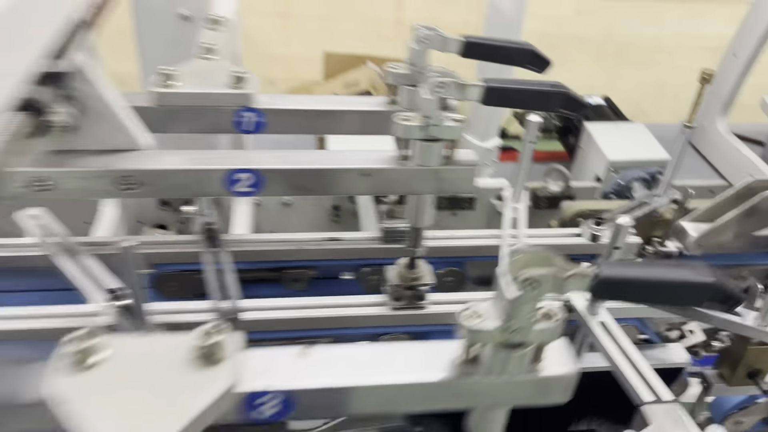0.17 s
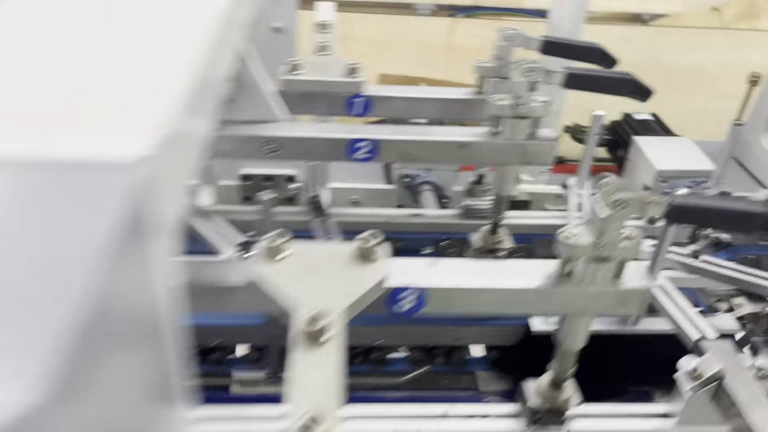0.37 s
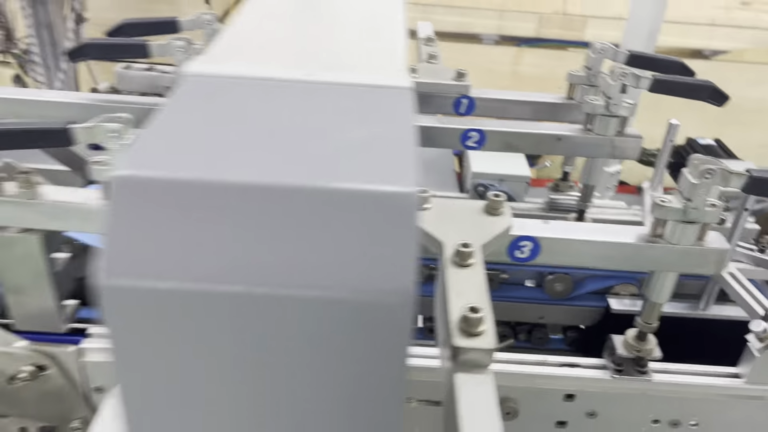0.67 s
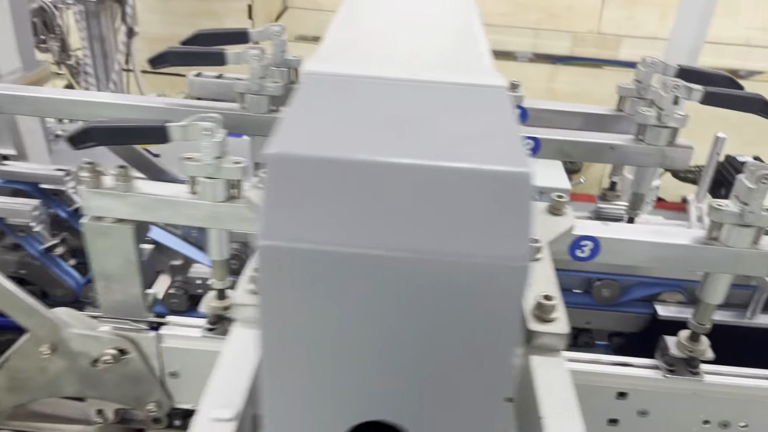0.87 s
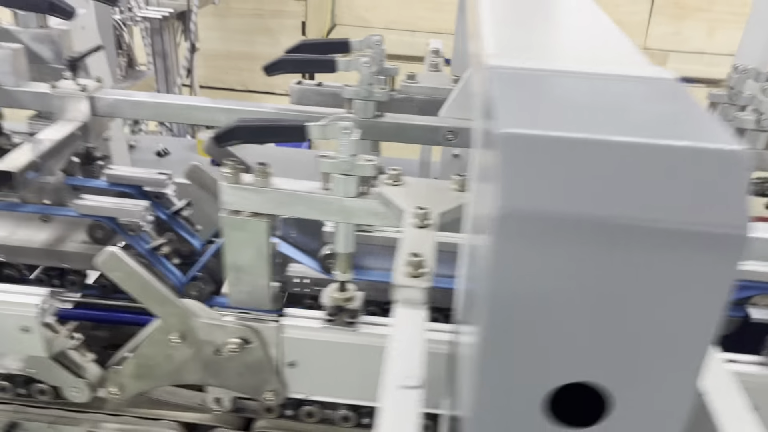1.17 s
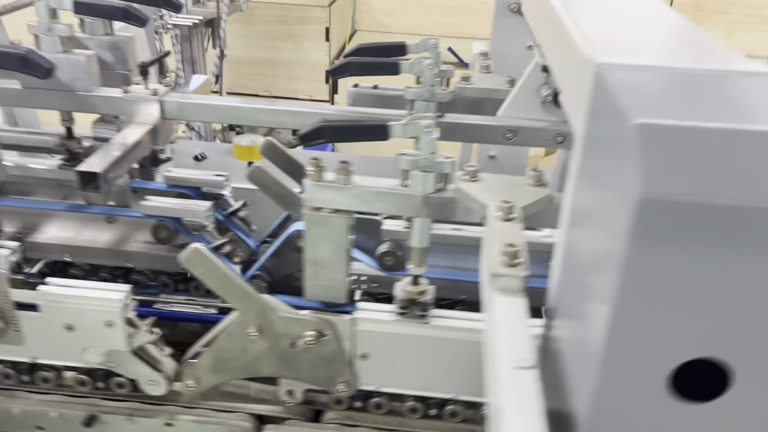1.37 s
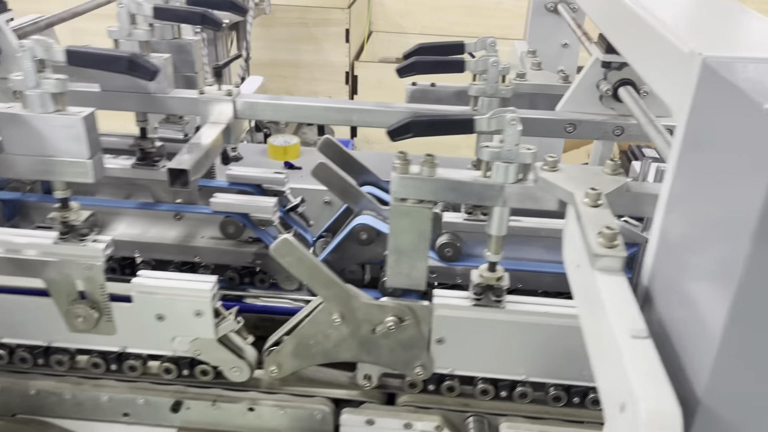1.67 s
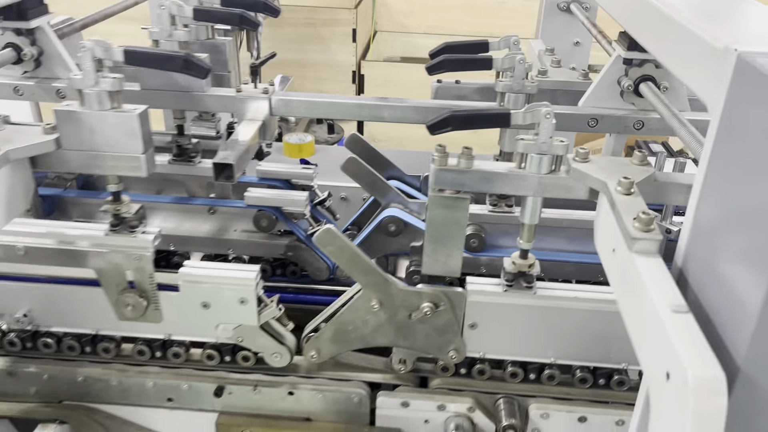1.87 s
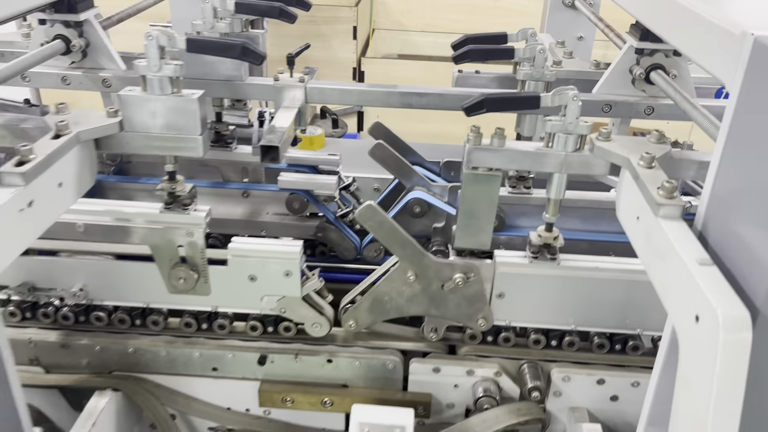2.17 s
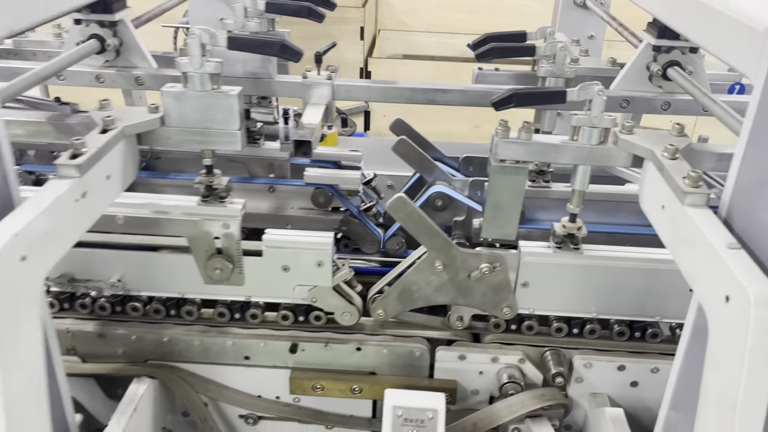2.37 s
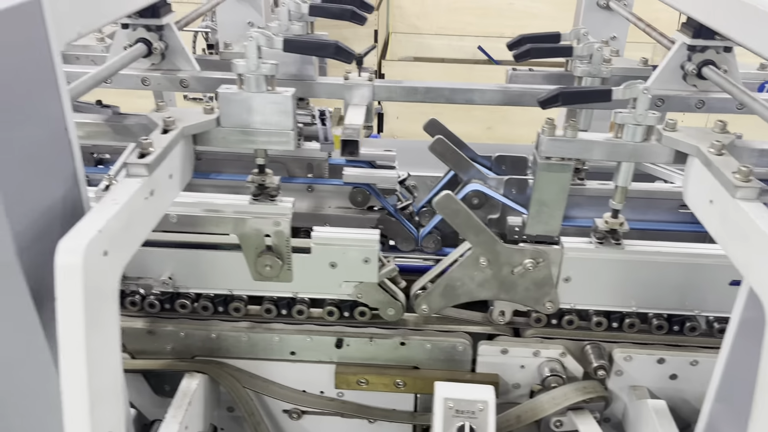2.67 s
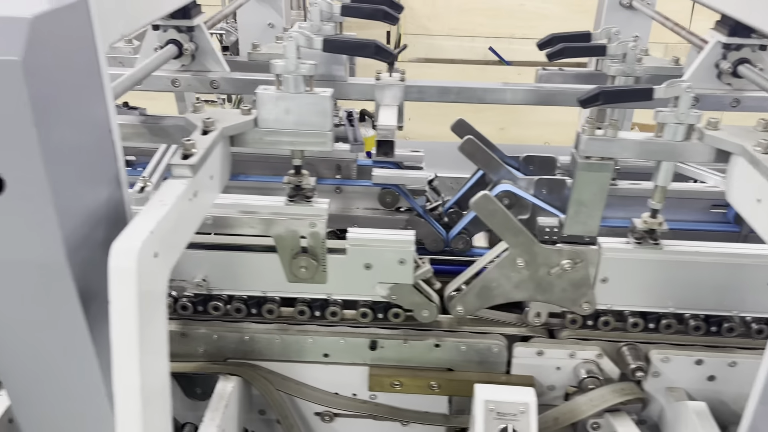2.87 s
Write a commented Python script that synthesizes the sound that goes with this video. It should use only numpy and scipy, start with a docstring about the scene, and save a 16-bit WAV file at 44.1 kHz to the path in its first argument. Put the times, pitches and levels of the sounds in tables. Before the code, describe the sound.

A folder gluer runs steadily in a workshop, about three blanks a second: each brings a rub, four rapid slaps, a metallic guide knock and a hollow boom, over rumble and chain rattle, heard close in stereo.

```python
"""In a workshop a folder gluer runs, passing about three cardboard blanks a second.
Each blank rubs along the belts, knocks the guides into a drone of beating sines, slaps through four
folding steps (noise bursts and ringing metal modes) and ends in a hollow, sagging boom.
Coloured noise makes the drive's rumble and the chain and roller rattle, sines its hum and thin motor whine.
The microphone drifts away from the slaps: their snap fades while their flutter grows."""
import sys
import numpy as np
from scipy import signal
from scipy.fft import rfft, irfft
from scipy.io import wavfile

SR = 44100
rng = np.random.default_rng(int(sys.argv[2]) if len(sys.argv) > 2 else 0)


def materialize(psi):
    """Save the field psi as 16-bit PCM at rate SR to the path in sys.argv[1].

    A 1-D psi becomes a single channel; in a 2-D psi each row is a channel.
    """
    bounded = np.clip(np.atleast_2d(psi).T, -1, 1)
    quanta = np.round(bounded * 32767).astype(np.int16)
    wavfile.write(sys.argv[1], SR, quanta)


N = 132741
T, HZ = np.arange(N) / SR, np.fft.rfftfreq(N, 1 / SR)

# Blanks passing through: start_s, slap_1_db, slap_2_db, slap_3_db, slap_4_db, rub_db, drone_db,
# guide_knock_db, boom_db
BLANKS = [(0.001, -21, -19, -16, -22.5, -28.5, -27.5, -21, -26.5),
          (0.342, -22, -18, -17, -25.5, -29.5, -26, -20, -25.5),
          (0.683, -28, -22, -19.5, -22.5, -32.5, -31.5, -24, -26.5),
          (1.024, -24.5, -22.5, -19, -23.5, -34.5, -33.5, -28, -25.5),
          (1.367, -25, -23.5, -21, -24.5, -34.5, -30.5, -21, -24.5),
          (1.708, -26.5, -26.5, -23, -27, -33.5, -29, -28, -27.5),
          (2.049, -25, -27, -23.5, -28.5, -32.5, -24.5, -16.5, -36),
          (2.392, -27.5, -26.5, -27, -30, -33, -26.5, -19.5, -38),
          (2.732, -28, -27, -32, -29.5, -32.5, -26.5, -19, -27.5)]
# Ringing modes of the guides: pitch_hz, level_db, pitch_waver_hz (for the drone)
GUIDES = [(354, -7, 4.7), (380, -12.5, 4.77), (394.3, -10.5, 4.1), (408.4, -3, 2.33), (439.5, -14, 6.1)]


def amp(db):
    """Decibels to gain."""
    return 10 ** (np.asarray(db) / 20)


def unit(x):
    """Scales to rms 1."""
    return x / np.sqrt(np.mean(abs(x) ** 2) + 1e-20)


def read(points):
    """Reads a spectrum table onto the frequency grid, straight lines over log frequency."""
    hz, value = np.transpose(points)
    return np.interp(np.log(HZ + 1), np.log(hz), value)


def colour(x, gain):
    """Filters by a gain curve scaled to mean power 1, so white noise keeps its level."""
    return irfft(rfft(x) * unit(gain), N)


def noise():
    """Two unrelated white noises."""
    return rng.standard_normal((2, N))


def waver(hz):
    """Slow chance movement of rms 1, up to about the given rate."""
    return unit(colour(rng.standard_normal(N), np.exp(-(HZ / hz) ** 2)))


def swell(start, delay, attack, hold, decay):
    """Envelope with straight attack, hold and exponential release, all in seconds."""
    t = T - start - delay
    return np.clip(t / attack, 0, 1) * np.exp(-np.maximum(t - attack - hold, 0) / decay)


def card_ring():
    """Broad resonances of the card, as a gain curve."""
    # Resonances: pitch_hz, width_hz, boost_db
    card = [(910, 130, 3), (1210, 100, 3), (1360, 110, 1.5), (1970, 870, 1), (2520, 450, 3.5),
            (3130, 290, 1)]
    boost_db = sum(db / (1 + (2 * (HZ - hz) / width) ** 2) for hz, width, db in card)
    return amp(boost_db)


def drive():
    """Frame rumble and belt wash are shaped noise; drive hum and motor tones are wavering sines."""
    # Frame rumble spectrum: frequency_hz, relative_level_db
    rumble_spectrum = [(30, -50), (55, -4), (72, -2.5), (84, -1.5), (100, 1), (120, -4), (155, -3),
                       (200, -4.5), (300, -10.5), (450, -28), (900, -36)]
    # Deep rumble spectrum: frequency_hz, relative_level_db
    deep_spectrum = [(15, -60), (30, -40), (38, -1.5), (48, 0.5), (58, 2), (70, -4), (100, -37), (200, -63)]
    # Belt wash spectrum: frequency_hz, relative_level_db
    wash_spectrum = [(100, -6), (250, -1.5), (450, 0.5), (600, -6), (750, -10.5), (1100, -9.5),
                     (1600, -13.5), (2600, -17.5), (3700, -19.5), (5000, -19.5), (7000, -26.5),
                     (9500, -24.5), (12000, -25.5), (14000, -32), (16000, -61)]
    # Moving levels of deep rumble and hum: time_s, deep_db, hum_db
    low_levels = [(0, -48, -31), (.12, -31, -31), (.45, -33, -41), (.59, -39, -50), (.72, -32.5, -32),
                  (1.1, -31.5, -38), (1.38, -40, -28.5), (1.68, -29, -35.5), (2, -39, -37),
                  (2.18, -31.5, -33.5), (2.33, -24, -27), (2.5, -26.5, -36), (2.62, -35, -43),
                  (2.8, -24.5, -37), (3, -42, -26)]
    # Steady drive tones: pitch_hz, level_db, level_waver_share, pitch_waver_hz
    tones = [(411.7, -43.5, 0.19, 2.03), (1168, -61, 0.61, 3.46), (10600, -57, .5, 14)]
    rumble_db, wash_db, wash_waver_db = -28.5, -29.5, 0.5
    hum_hz, hum_waver_hz = 80.66, 2.57

    times, deep_db, hum_db = np.transpose(low_levels)
    out = colour(noise(), amp(read(rumble_spectrum))) * amp(rumble_db)
    out += colour(noise(), amp(read(deep_spectrum))) * amp(np.interp(T, times, deep_db))
    out += colour(noise(), amp(read(wash_spectrum))) * amp(wash_db + wash_waver_db * waver(hz=40))
    hum_turns = np.cumsum(hum_hz + hum_waver_hz * waver(hz=13.0)) / SR
    out[0] += unit(np.sin(2 * np.pi * hum_turns)) * amp(np.interp(T, times, hum_db))
    for hz, db, share, waver_hz in tones:
        turns = np.cumsum(hz + waver_hz * waver(hz=13.3)) / SR
        out[0] += amp(db) * unit(np.sin(2 * np.pi * turns) * (1 + share * waver(hz=22)))
    return out


def whine():
    """The motor's thin whine: one high sine that wavers in pitch and flickers in level."""
    # Level of the whine: time_s, level_db
    whine_levels = [(0, -44), (.6, -48.5), (1.3, -52), (1.75, -46.5), (1.95, -45.5), (2.15, -51),
                    (2.4, -48), (3, -47)]
    pitch_hz, pitch_waver_hz, flicker_share = 10668, 5.83, 0.49

    turns = np.cumsum(pitch_hz + pitch_waver_hz * waver(hz=25)) / SR
    tone = np.sin(2 * np.pi * turns)
    level = amp(np.interp(T, *np.transpose(whine_levels)))
    flickering = unit(tone * (1 + flicker_share * waver(hz=45)))
    return np.array([level * flickering, np.zeros(N)])


def rattle():
    """Chain links and rollers tick at random: short decaying noise grains of uneven size."""
    # Rattle spectrum: frequency_hz, relative_level_db
    rattle_spectrum = [(300, -20), (900, 11), (1600, -10), (2800, 3.5), (5000, -6.5), (8000, 0),
                       (12000, -3), (15500, -21)]
    level_db, ticks_per_s, spread_db, decay_s = -43.5, 350, 4, 0.0013

    strikes = rng.random(N) < ticks_per_s / SR
    size = amp(spread_db * np.minimum(rng.exponential(1, N), 3.5)) * strikes
    # Overlapping grains add in power
    power = signal.lfilter([1], [1, -np.exp(-1 / (decay_s * SR))], size ** 2)
    grains = noise() * np.sqrt(power)
    return amp(level_db) * unit(colour(grains, amp(read(rattle_spectrum))))


def drone():
    """The guides sing in a cluster of beating low modes while a blank drags over them."""
    roughness = 0.26  # share of level waver
    level = sum(amp(db) * swell(start, delay=-0.091, attack=0.07, hold=0.12, decay=0.055)
                for start, *_, db, _, _ in BLANKS)
    ring = np.zeros((2, N))
    for row in ring:
        for hz, db, waver_hz in GUIDES:
            turns = np.cumsum(hz + waver_hz * waver(hz=19.9)) / SR + rng.random()
            row += amp(db) * unit(np.sin(2 * np.pi * turns) * (1 + roughness * waver(hz=40.4)))
    return ring * level


def rub():
    """Each blank scrapes unevenly between belts and rails: rough noise through the card's resonances."""
    # Rub spectrum: frequency_hz, relative_level_db
    rub_spectrum = [(200, -41), (550, 9.5), (900, 1.5), (1400, 4), (2000, -4), (3100, 1), (5000, -3),
                    (8000, -7), (12000, -13.5), (15500, -11)]
    level = sum(amp(db) * swell(start, delay=-0.062, attack=0.15, hold=0.045, decay=0.046)
                for start, *_, db, _, _, _ in BLANKS)
    unevenness = amp(2.0 * waver(hz=160))
    return colour(noise() * level * unevenness, amp(read(rub_spectrum)) * card_ring())


def knocks():
    """Each blank bumps the guides: their low modes start together, then beat as they die."""
    delay_s, attack_s, detune_hz = 0.00498, 0.01007, 3.25
    out = np.zeros((2, N))
    for start, *_, db, _ in BLANKS:
        t = T - start - delay_s - attack_s  # the modes line up at the end of the attack
        ring = np.zeros(N)
        for hz, mode_db, _ in GUIDES:
            detuned_hz = hz + detune_hz * rng.standard_normal()
            ring += amp(mode_db) * np.cos(2 * np.pi * detuned_hz * t)
        out[0] += amp(db) * swell(start, delay_s, attack_s, hold=0.014, decay=0.062) * ring
    return out


def slaps():
    """Flaps snap against the folders, rebound and flutter as noise; the metal rings in decaying sines."""
    # Contact and rebounds, one list per folding step: delay_s after the blank's start, relative_level_db
    folds = [
        [(-.021, 4), (-.018, 1.5), (-.015, -2)],
        [(.021, 3.5), (.0235, -0.5), (.027, -3)],
        [(.064, 1.5), (.0695, 1.5), (.073, -1.5), (.085, -3.5)],
        [(.109, 1.5), (.112, -2), (.119, -2)],
    ]
    # Noise of each folding step: snap_db, snap_decay_s, flutter_db, flutter_decay_s
    fold_tone = [(2, 0.002, -10.5, 0.014), (1.5, 0.0013, -13, .0034), (0.5, 0.00083, -9, 0.0052),
                 (4.5, 0.0014, -5.5, 0.017)]
    # Modes of the metal folder, one list per folding step: pitch_hz, relative_level_db, t60_s
    folder_modes = [
        [(1034, -12, .05), (2600, -16, 0.056), (4190, -10, 0.022), (4750, -26, 0.022)],
        [(2370, -7.5, 0.023), (2630, -13, 0.033), (2900, -8, 0.036), (4980, -14, 0.053), (5440, -12.5, 0.056),
         (5730, -14, 0.018)],
        [(1716, -12.5, 0.034), (1930, -10, 0.019), (2255, -12.5, 0.023), (2470, -15, .02), (3140, -13, 0.02),
         (4440, -9, 0.021), (7190, -9.5, .025)],
        [(1080, -8.5, 0.1), (1760, -19, 0.061), (2410, -22, .06), (3220, -18, .06), (12200, -13, .06)],
    ]
    # Colour of snap and flutter, one list per folding step: frequency_hz, relative_level_db
    fold_colours = [
        [(150, 12.5), (500, 4), (1000, 5.5), (1400, 2), (2600, 0), (3700, -1.5), (4600, 2), (6300, -4),
         (9000, 0), (12500, -9), (15500, -20)],
        [(150, 14), (500, -1), (1000, -8), (1900, -13), (2600, -1), (3700, -3), (5600, 5), (6600, -3),
         (9000, -5), (12500, -8), (15500, -19)],
        [(150, 0.5), (500, -6), (1300, -9.5), (2100, 7.5), (3100, 4.5), (3800, -6), (5000, -0.5), (6300, -1.5),
         (9000, 3), (12500, 1), (15500, -5)],
        [(150, 12.5), (600, -6), (1100, 6), (1700, -1), (2100, -4), (3300, 2.5), (4200, -2.5), (6300, -4),
         (9000, 1.5), (12500, -4.5), (15500, -9)],
    ]
    snap_fade_db_per_s, flutter_rise_db_per_s, ring_fade_db_per_s = 4, 1.7, 0.4
    ring_rise_s, ring_detune_share, ring_scatter_db = 0.0016, 0.012, 2

    out, t = np.zeros((2, N)), T[:SR // 8]
    for k, contacts in enumerate(folds):
        snap_db, snap_s, flutter_db, flutter_s = fold_tone[k]
        hz, mode_db, t60 = np.transpose(folder_modes[k])[:, :, None]
        blows = np.zeros(N)  # power of each contact
        for start, *levels in BLANKS:
            for delay, contact_db in contacts:
                at = int((start + delay) * SR)
                detune, scatter, *phases = rng.uniform(-1.11, 1, (4, len(hz), 1))
                if not 0 <= at < N:
                    continue
                blow_db = levels[k] + contact_db
                blows[at] += amp(blow_db) ** 2
                ring_db = blow_db + mode_db + ring_scatter_db * scatter - ring_fade_db_per_s * start
                ring_level = amp(ring_db - 60 * t / t60) * np.minimum(t / ring_rise_s, 1)
                ring_hz = hz * (1 + ring_detune_share * detune)
                ring = ring_level * np.sin(2 * np.pi * ring_hz * t + np.pi * np.array(phases))
                out[:, at:at + len(t)] += ring.sum(1)[:, :N - at]
        snap_blows = blows * amp(snap_db - snap_fade_db_per_s * T) ** 2
        flutter_blows = blows * amp(flutter_db + flutter_rise_db_per_s * T) ** 2
        power = signal.oaconvolve(snap_blows, np.exp(-2 * T / snap_s))
        power += signal.oaconvolve(flutter_blows, np.exp(-2 * T / flutter_s))
        burst = noise() * np.sqrt(abs(power))[:N]
        out += colour(burst, amp(read(fold_colours[k])) * card_ring())
    return out


def clacks():
    """Now and then a stiff flap lands hard: a noise burst around a knock pitch of its own."""
    # Hard landings: start_s, level_db, decay_s, knock_pitch_hz
    landings = [(0.0704, -12, 0.0024, 2240), (0.1194, -24.5, 0.0092, 1380), (0.752, -30, .004, 2300),
                (.806, -29, .009, 1230), (1.0882, -25, 0.0018, 2500), (1.093, -24.5, 0.0035, 2520),
                (2.5017, -29.5, 0.014, 2770)]
    width_octaves = 0.68
    out = np.zeros((2, N))
    for start, db, decay, hz in landings:
        body = np.exp(-(np.log2((HZ + 1) / hz) / width_octaves) ** 2 / 2)
        burst = noise() * amp(db) * swell(start, delay=0, attack=0.00042, hold=0, decay=decay)
        out += colour(burst, body * card_ring())
    return out


def ticks():
    """Card edges catch the rails with a thin, bright tick of very short noise."""
    # Ticks: start_s, level_db
    catches = [(.086, -22), (.767, -22), (1.736, -31), (1.789, -26), (1.8192, -20), (2.077, -28),
               (2.473, -20), (2.811, -25.5)]
    # Tick spectrum: frequency_hz, relative_level_db
    tick_spectrum = [(1000, -35), (4000, -19), (7000, -3), (10500, 13), (13000, 3), (15500, -8)]
    level = sum(amp(db) * swell(start, delay=0, attack=0.0003, hold=0, decay=0.0016)
                for start, db in catches)
    return colour(noise() * level, amp(read(tick_spectrum)))


def workshop(x):
    """The room's short diffuse tail: decaying noise, duller than the direct sound."""
    t60_s, rise_s, dulling_hz = 0.34, 0.0083, 6000
    t = T[:SR // 2]
    tail = colour(noise(), 1 / np.sqrt(1 + (HZ / dulling_hz) ** 2))[:, :len(t)]
    tail *= amp(-60 * t / t60_s) * np.minimum(t / rise_s, 1)
    return signal.fftconvolve(x, tail / np.linalg.norm(tail[0]), axes=1)[:, :N]


def booms():
    """A hollow note follows each set of slaps: a sine whose pitch sags slightly."""
    delay_s, pitch_hz, sag_hz_per_s = 0.13, 167.7, 19
    out = np.zeros((2, N))
    for start, *_, db in BLANKS:
        hz = pitch_hz - sag_hz_per_s * (T - start - delay_s)
        tone = unit(np.sin(2 * np.pi * (np.cumsum(hz) / SR + rng.random())))
        out[0] += amp(db) * swell(start, delay_s, attack=0.024, hold=0.026, decay=0.062) * tone
    return out


def ports(x):
    """Two microphone ports hear a shared part (row 0), shifted in phase, and a diffuse part (row 1)."""
    # Likeness of the ports: frequency_hz, correlation (1 = alike)
    likeness = [(50, .995), (160, .96), (350, .91), (600, .75), (900, .52), (1400, .2), (2000, .8),
                (3500, .62), (5300, .48), (7000, .78), (7900, .97), (8300, .995), (8700, .97), (9400, .84),
                (11000, .86), (11400, .99), (12300, .99), (13500, .73), (14400, .78), (14900, .98)]
    # Phase by which left leads right: frequency_hz, lead_radians
    lead = [(10, 0), (700, 0), (1100, .3), (1500, -1), (1900, .05), (3000, .7), (5000, .5), (5700, -1),
            (6500, -1.2), (7900, -3.05), (8700, -3.25), (10000, -4.7), (11300, -6.2), (12400, -6.35),
            (13500, -7.6), (14300, -8.5), (14700, -9.3), (15800, -9.5)]
    # Left minus right: frequency_hz, difference_db
    balance = [(40, .4), (150, 1.6), (500, 1), (1300, -.7), (2800, 2), (5500, 2.2), (9000, 0), (15000, 0)]
    a, b = rfft(x)
    like = np.clip(read(likeness), 0, 1)
    shared = a * np.sqrt((1 + like) / 2)
    apart = b * np.sqrt((1 - like) / 2)
    lean = amp(read(balance) / 2) * np.exp(.5j * read(lead))  # half to each side
    return irfft(np.array([(shared + apart) * lean, (shared - apart) / lean]), N)


def scene():
    """The whole machine at the microphone; only slaps, clacks and ticks feed the room tail."""
    room_db = -9
    folding = slaps() + clacks() + ticks()
    mix = folding + amp(room_db) * workshop(folding)
    mix = mix + rub() + drone() + knocks() + booms()
    mix = mix + drive() + whine() + rattle()
    return ports(mix)


def record(dry):
    """The recorder's band limit: a steep low-pass."""
    edge_hz = 15800
    lowpass = signal.firwin(511, edge_hz, window=("kaiser", 9), fs=SR)
    return signal.oaconvolve(dry, lowpass[None], "same")


dry = scene()
out = record(dry)
materialize(out)
```